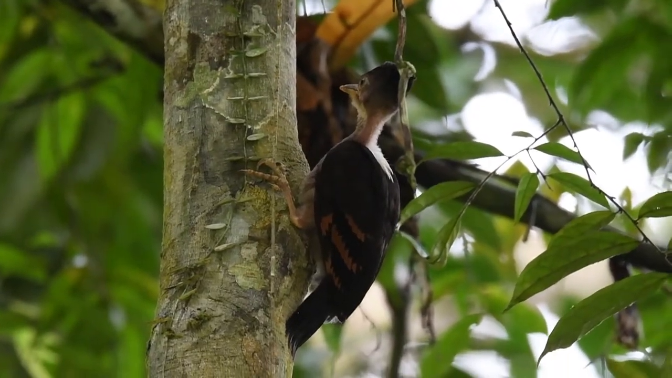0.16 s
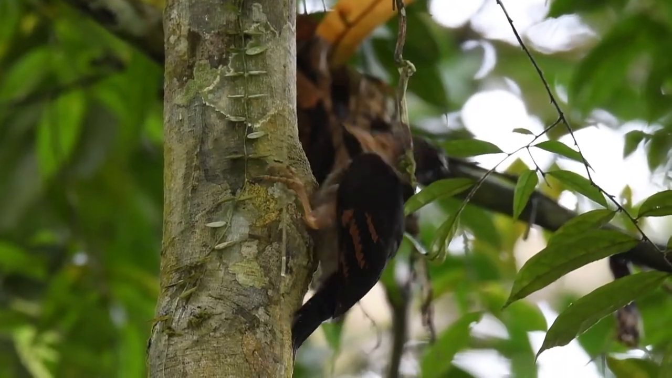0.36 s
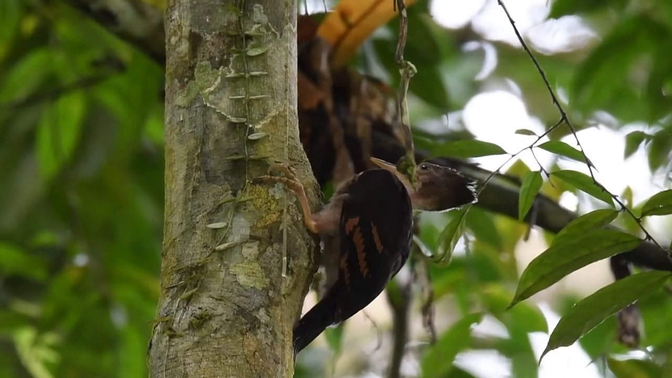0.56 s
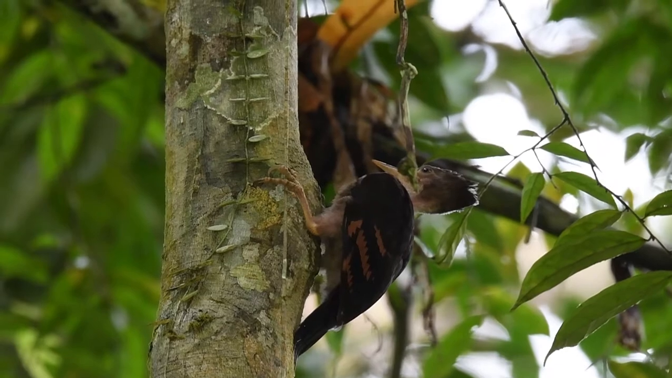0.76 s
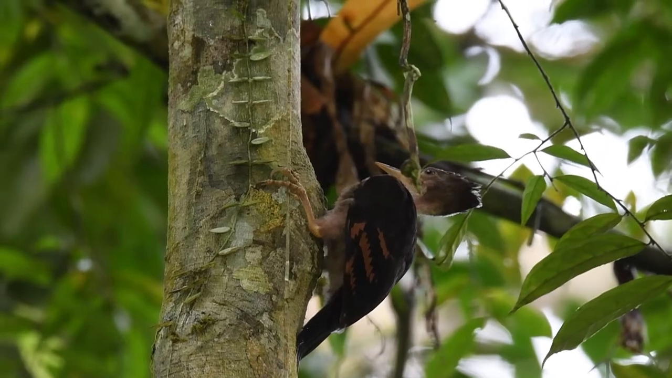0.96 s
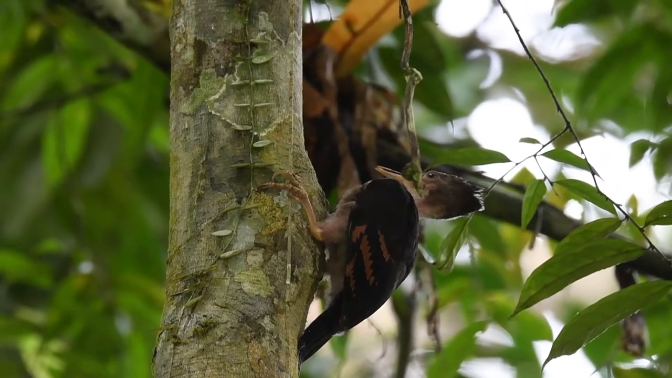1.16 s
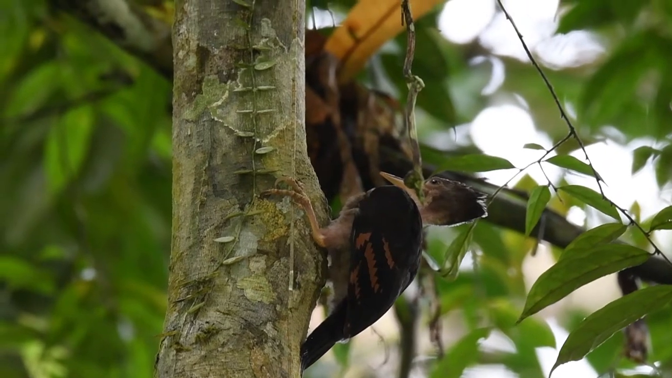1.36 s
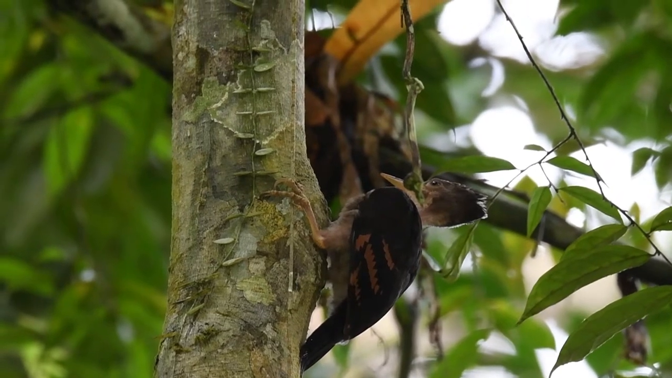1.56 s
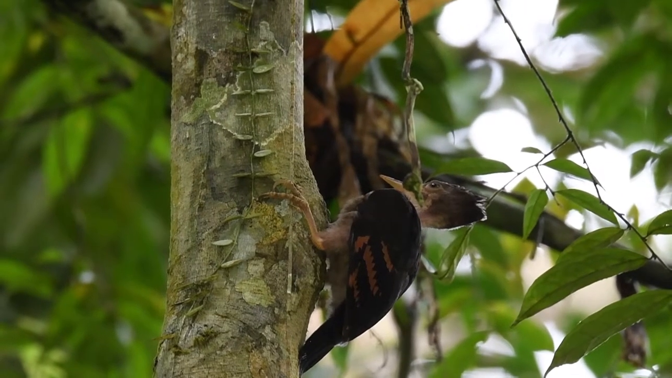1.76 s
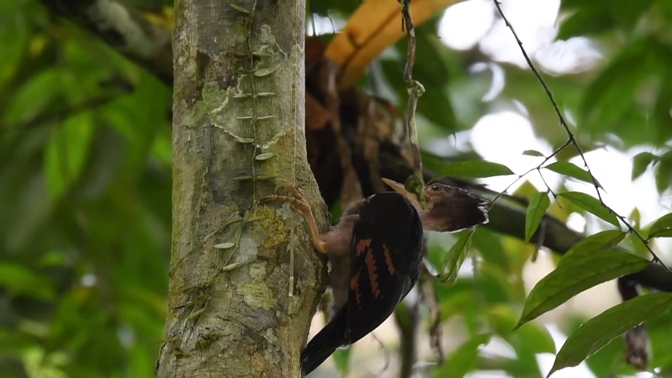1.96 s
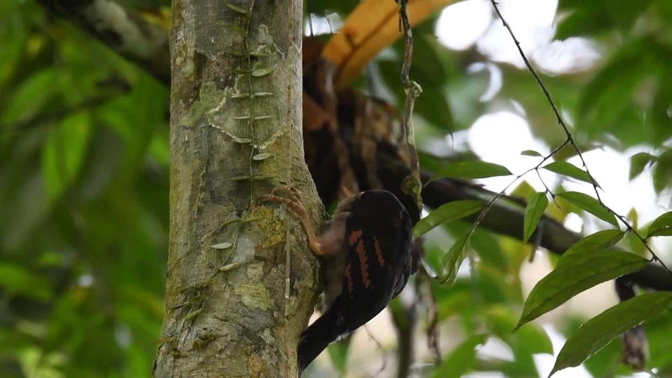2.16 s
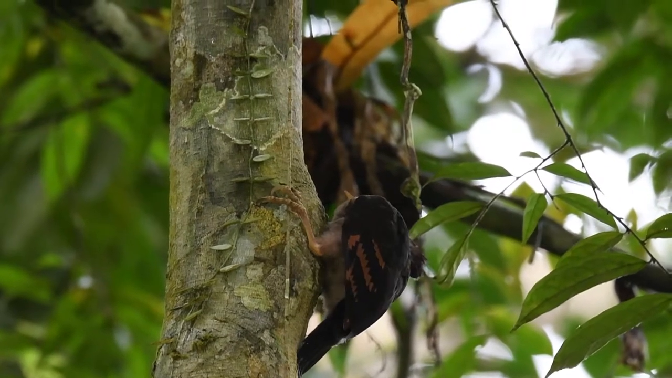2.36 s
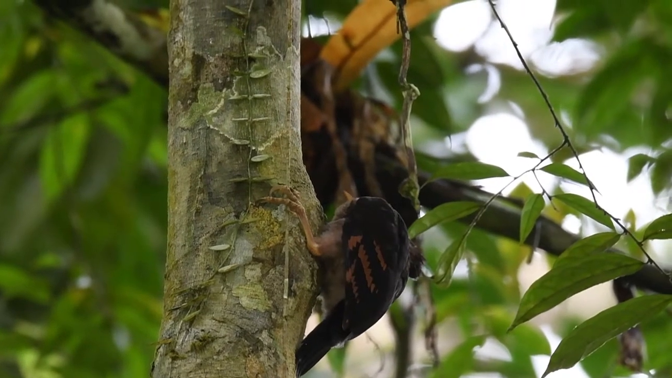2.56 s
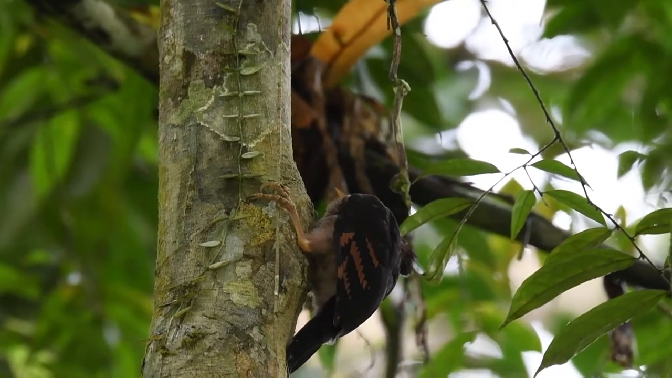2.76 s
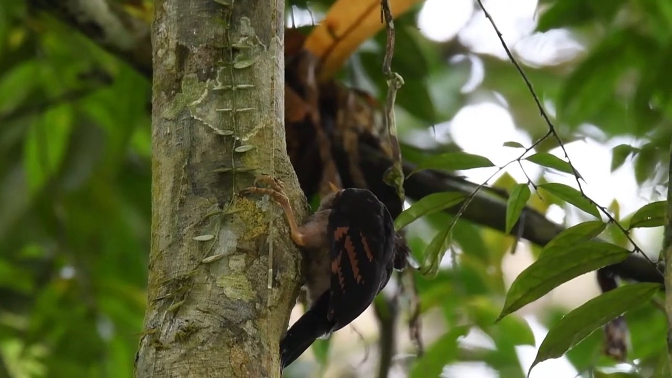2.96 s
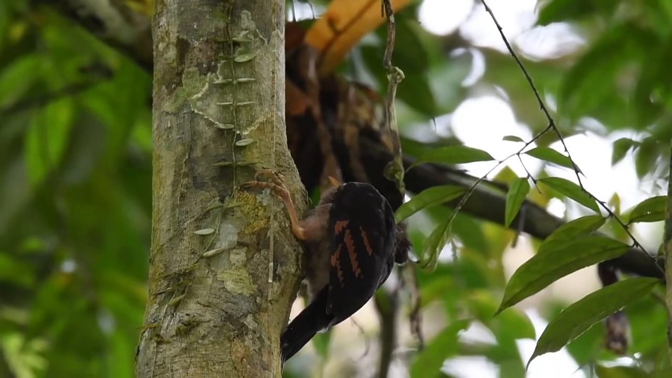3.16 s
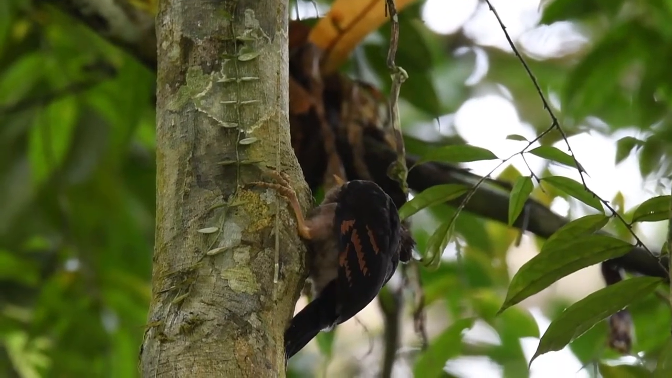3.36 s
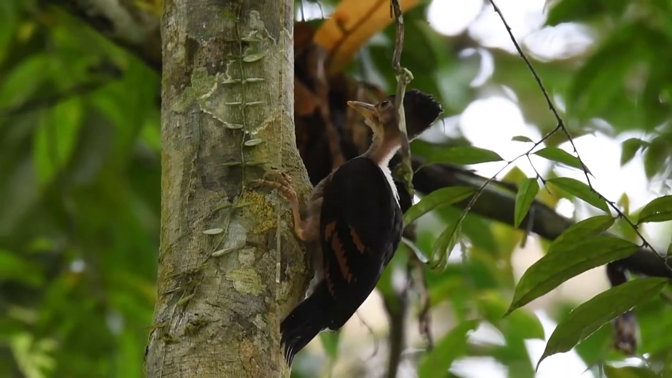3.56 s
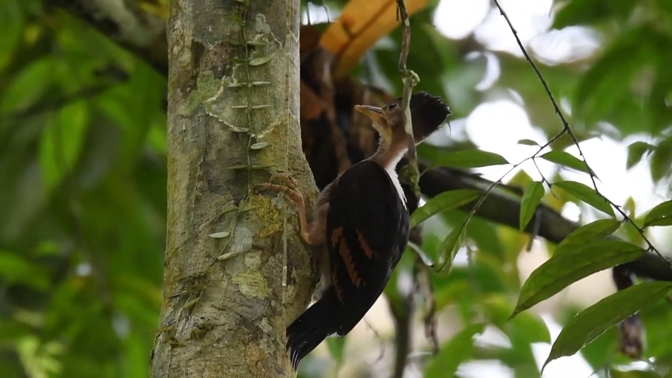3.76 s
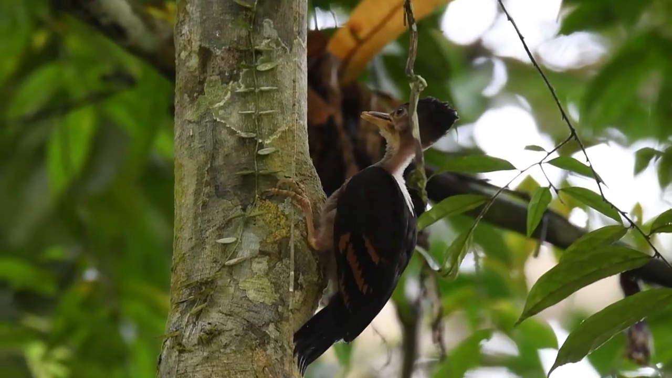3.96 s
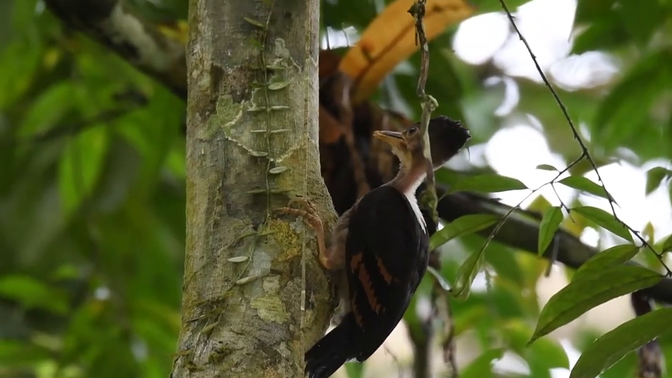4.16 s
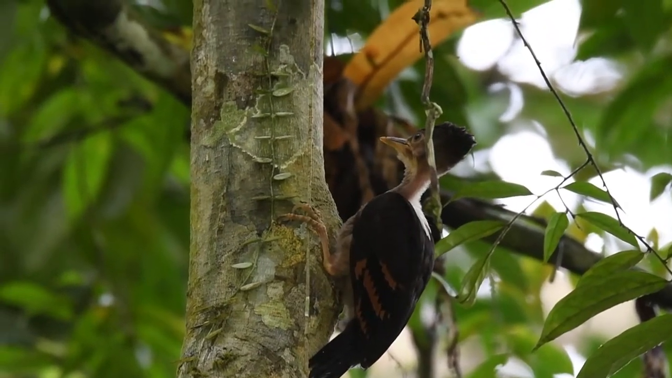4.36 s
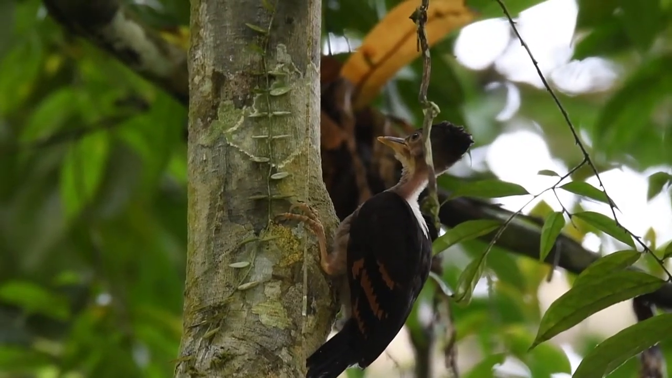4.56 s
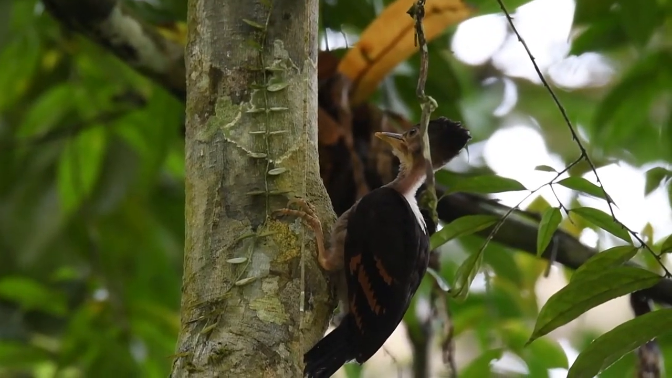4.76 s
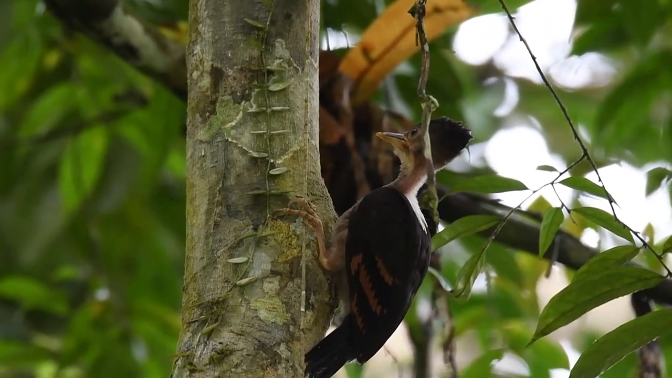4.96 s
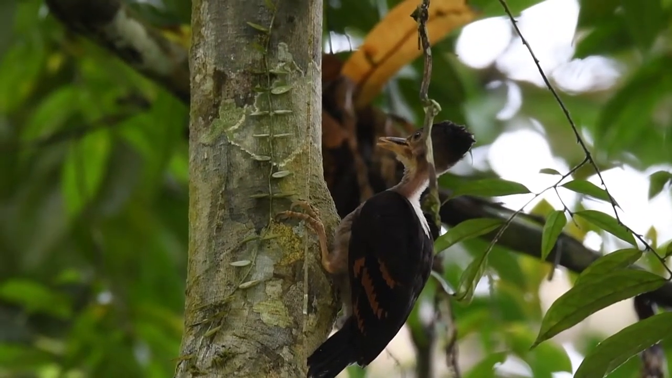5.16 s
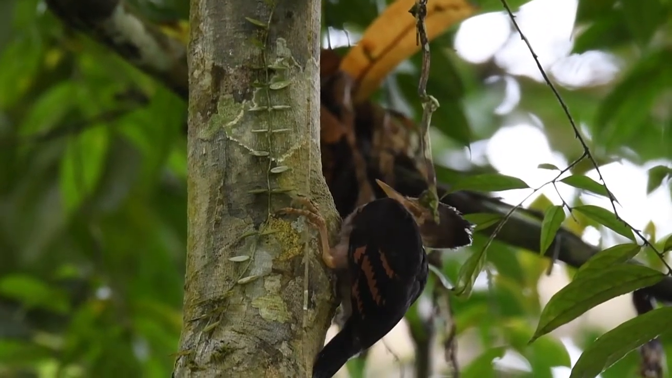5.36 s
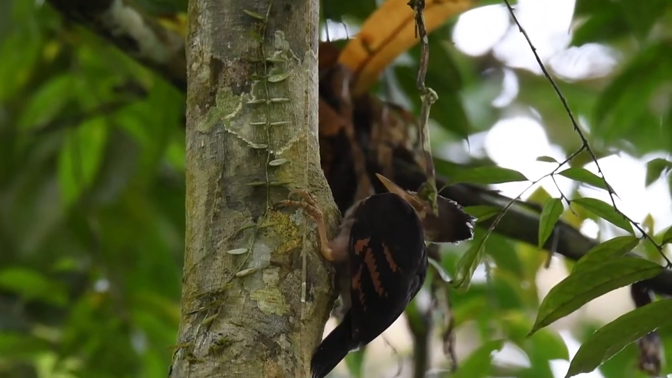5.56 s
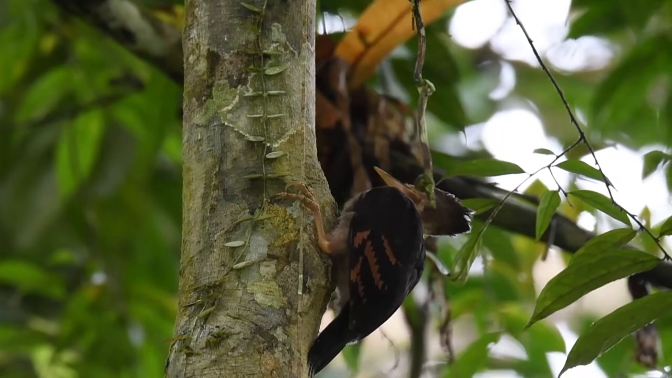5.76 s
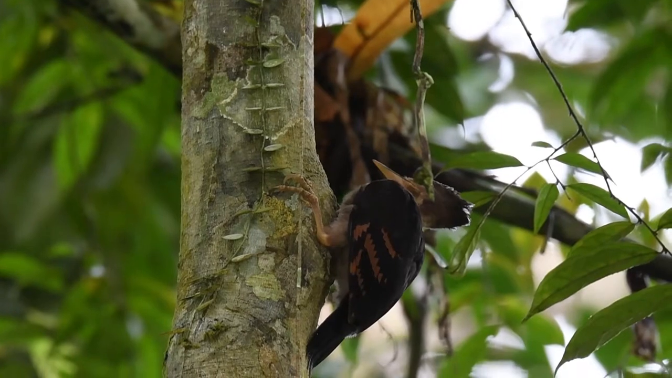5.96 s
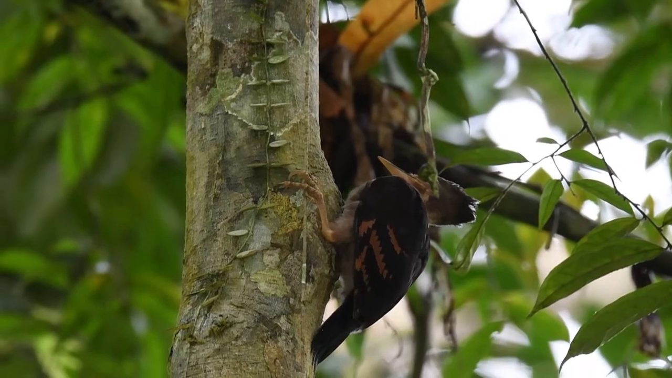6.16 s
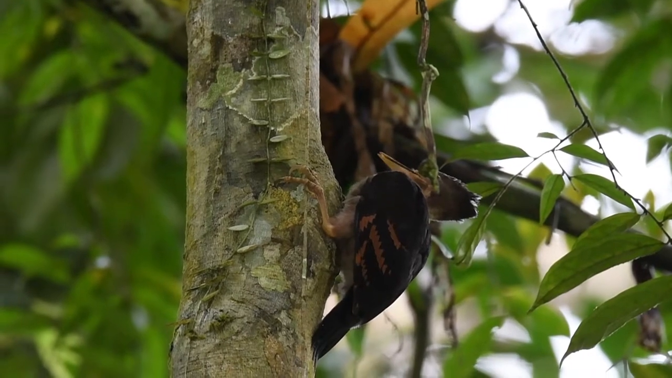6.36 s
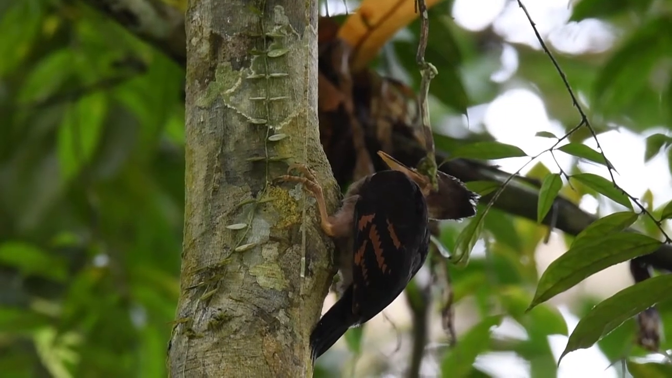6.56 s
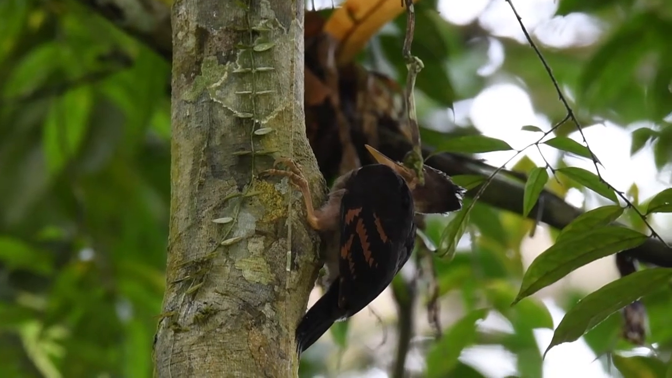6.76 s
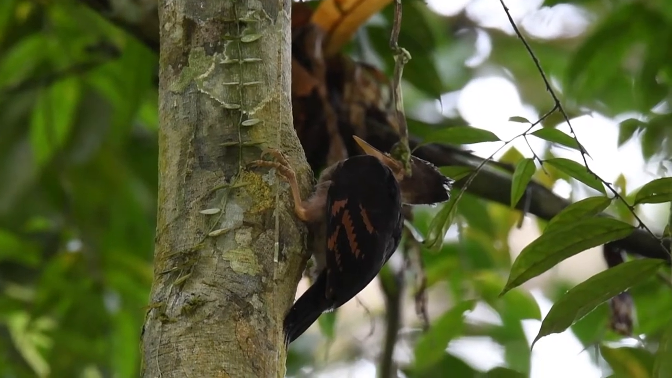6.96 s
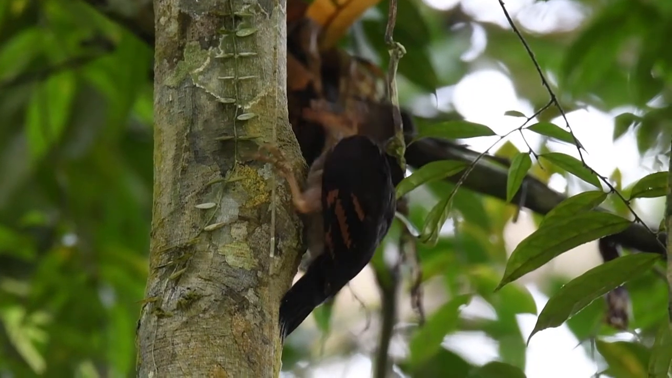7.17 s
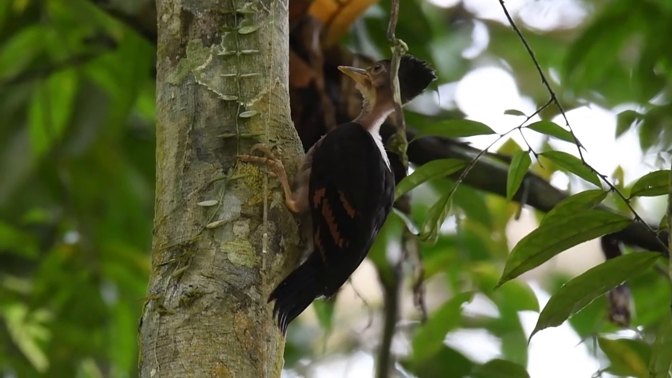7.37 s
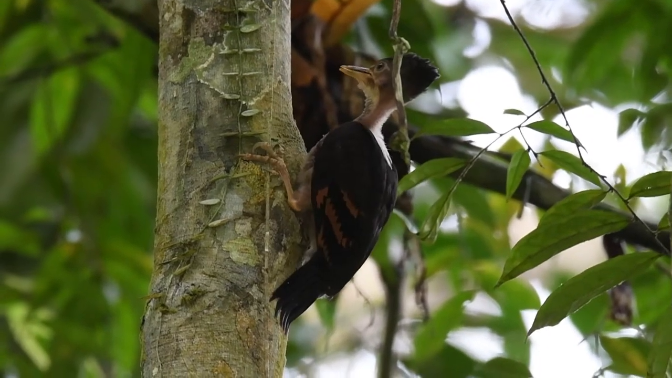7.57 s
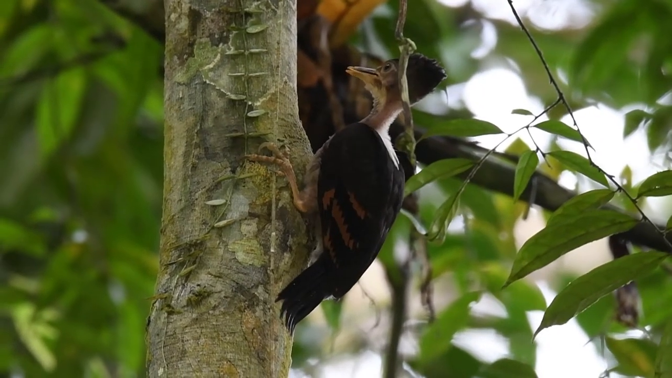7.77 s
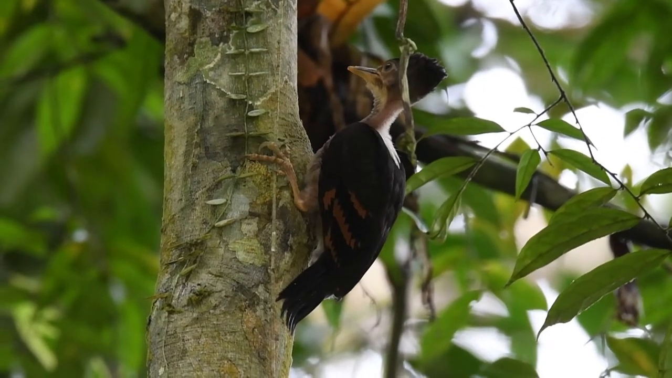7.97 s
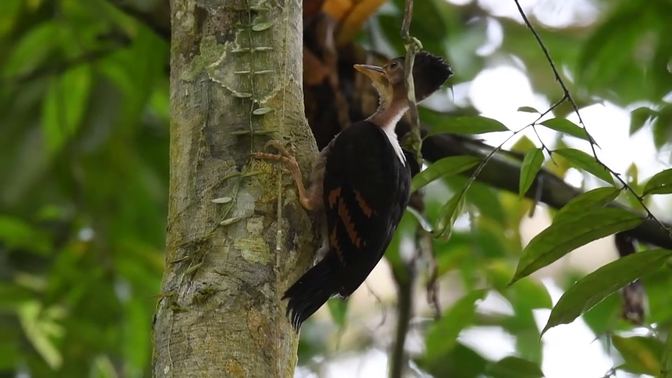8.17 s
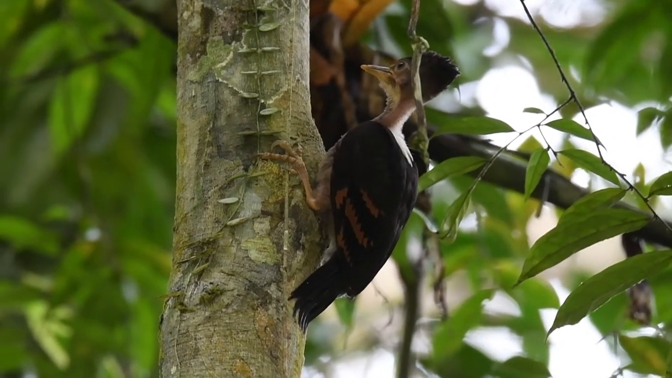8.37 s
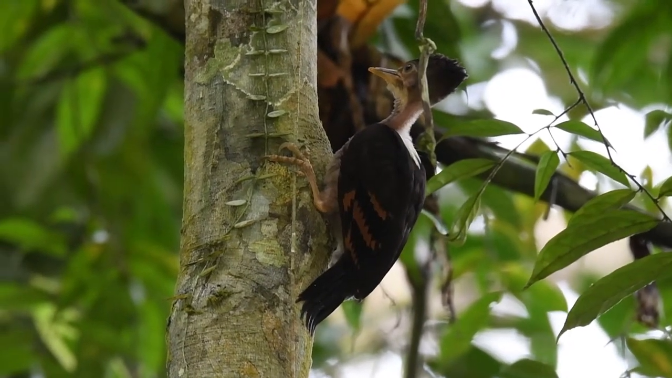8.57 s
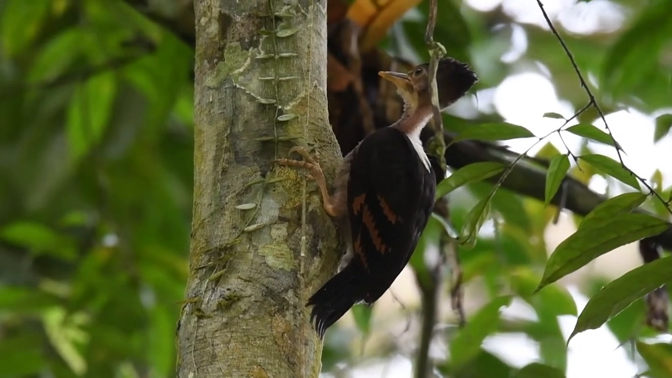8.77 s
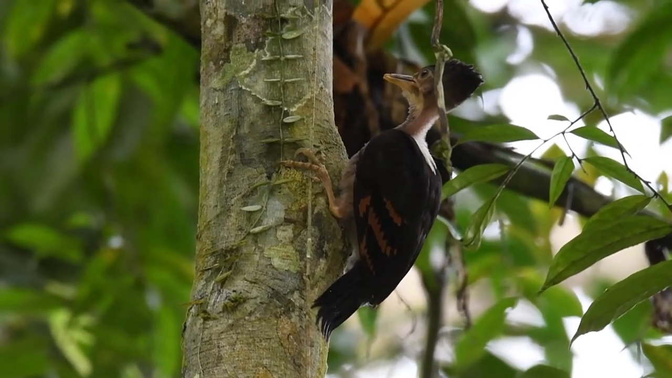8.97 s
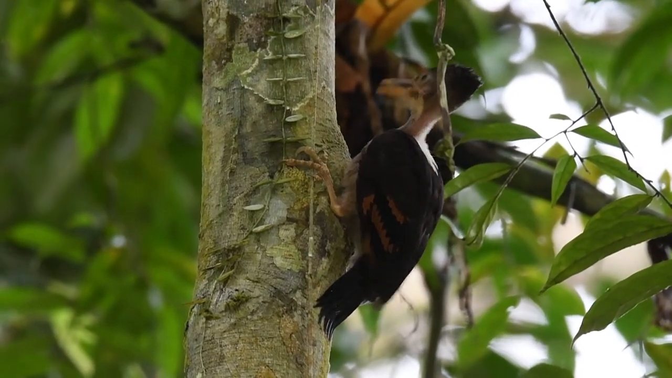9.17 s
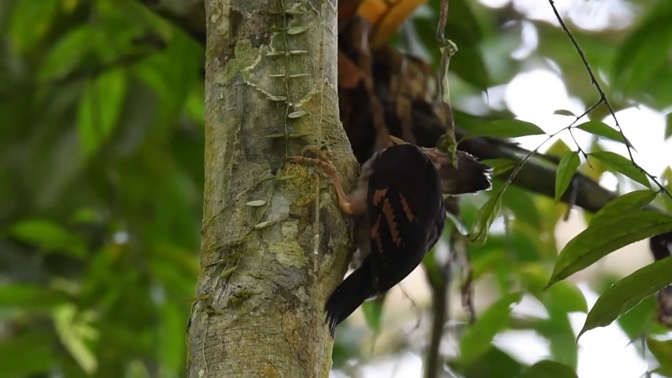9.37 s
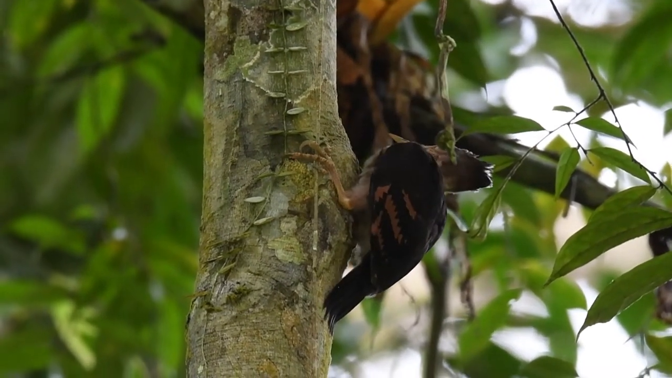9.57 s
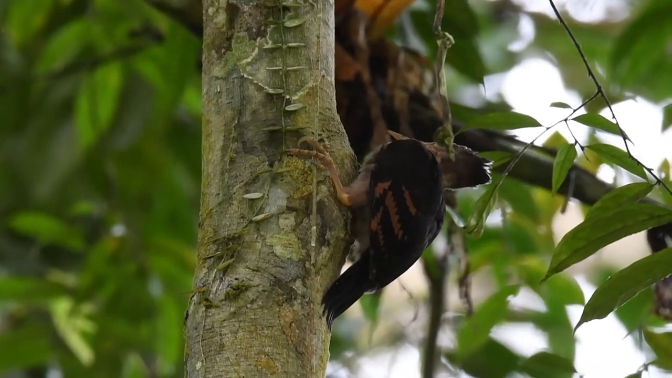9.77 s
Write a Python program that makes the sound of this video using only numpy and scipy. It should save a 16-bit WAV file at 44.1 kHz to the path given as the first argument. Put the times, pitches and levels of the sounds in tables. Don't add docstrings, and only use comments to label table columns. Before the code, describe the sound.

A young woodpecker on a trunk gives six very brief, piercing yelps roughly two seconds apart, loud and slightly overloaded, each ringing on among the trees. Between them a distant bird pips about six times a second, pausing around each yelp. Steady broadband hiss from a stream and insects lies beneath, with thin high cicada whine, faint cricket whistles and rasping katydid bursts. Outdoor stereo camera microphone.

```python
import sys
import numpy as np
from scipy import signal
from scipy.fft import rfft, irfft, next_fast_len
from scipy.io import wavfile
from scipy.ndimage import uniform_filter1d, map_coordinates

SR = 44100
rng = np.random.default_rng(int(sys.argv[2]) if len(sys.argv) > 2 else 0)


def unload_wav(signal):
    wavfile.write(
        sys.argv[1],
        SR,
        np.round(np.clip(np.atleast_2d(signal).T, -1, 1) * 32767).astype(np.int16),
    )


def attenuation_scalar(level_db):
    decades = np.asarray(level_db, float) / 20
    return 10 ** decades


N = 433062

# start_s, top_pitch_hz, second_harmonic_db, third_harmonic_db, beak_open_after_s
YELPS = [
    (0.335, 1814, -13.5, -5, 0.021),
    (2.13, 1893, -10.5, -12.5, 0.029),
    (3.449, 1874, -10.5, -12, .027),
    (5.257, 1868, -13.5, -3, 0.019),
    (7.175, 1915, -10, -8.5, 0.029),
    (9.253, 1843, -14, -4, 0.022),
]
# time_s, climb_share (0 = resting pitch, 1 = top)
YELP_CLIMB = [(0, -.7), (.005, .18), (.011, .7), (.016, .96), (.0195, 1), (.026, .6), (.033, 0),
              (.035, -.25)]
# first_pip_s, last_pip_s, middle_late_s, level_db
PHRASES = [
    (0.124, 0.287, 0, -30.5),
    (0.584, 2.05, -0.023, -28),
    (2.392, 3.373, -0.0085, -27.5),
    (3.692, 5.21, -0.0064, -28.5),
    (5.536, 7.114, .004, -28),
    (7.442, 9.208, .01, -30),
    (9.543, 9.721, 0, -29.5),
]
PIP_COUNTS = [2, 10, 7, 10, 10, 11, 2]
# start_s, end_s, start_hz, end_hz, curve_power (how the pitch sinks)
CICADA_SONGS = [
    (1.15, 9.4, 6213, 5920, 1),
    (1.6, 8.9, 6185, 5995, 1.9),
    (0, 9.82, 5900, 5865, 1),
]
# fundamental_db, octave_db, peak_share (0-1 of the song), blur_hz
CICADA_VOICES = [(-46, -49.5, 0.22, 35), (-46.5, -52, 0.59, 31), (-78, -58.5, 0.9, 25)]
# time_s, pitch_hz, level_db, blur_hz
WIND_UP = [(0, 6090, -42, 300), (.5, 6120, -39.5, 280), (1.1, 6195, -37.5, 200), (1.32, 6208, -42, 120),
           (1.5, 6205, -58, 50)]
# start_s, end_s, start_hz, end_hz, level_db
WHISTLES = [(0, .3, 8610, 8560, -50), (.95, 1.75, 8685, 8570, -49), (2.1, 2.9, 8700, 8585, -49),
            (3.1, 4.2, 8750, 8625, -49), (4.35, 5.3, 8800, 8665, -49), (5.55, 6.55, 8820, 8695, -49),
            (6.75, 7.5, 8830, 8620, -51)]
# start_s, end_s, level_db
KATYDID_BURSTS = [(.1, .63, -41.5), (.78, 1.41, -42.5), (1.524, 2.174, -42), (2.331, 2.897, -42.5),
                  (3.062, 3.671, -42.5), (3.832, 4.4, -43), (4.53, 5.13, -43), (5.271, 5.886, -41.5),
                  (6.074, 6.682, -43), (6.814, 7.398, -42), (7.53, 8.12, -42.5), (8.28, 8.83, -43),
                  (9.036, 9.63, -42), (9.75, 9.9, -43)]
# frequency_hz, density_db (per Hz)
HISS_LEFT = [(25, -28), (80, -12.5), (250, -4.5), (700, -0.5), (1800, -0.5), (2500, -8), (3100, -1.5),
             (4000, -3), (6200, -2.5), (7200, -6), (8700, -3), (10300, -6.5), (11500, -19), (12400, -17.5)]
HISS_RIGHT = [(25, -30), (80, -12.5), (250, -4.5), (700, 0), (1400, 4.5), (2500, -1.5), (3100, -1),
              (4600, -2), (6300, 1.5), (7200, -4.5), (8700, -4), (10300, -16), (11500, -15), (12400, -17)]
# frequency_hz, likeness (0-1)
HISS_LIKENESS = [(60, 0.98), (110, 1.0), (190, 1.0), (350, 1), (630, 0.92), (1130, 0.29), (2030, 0.0),
                 (3650, 0), (6570, 0), (11800, 0)]
# frequency_hz, decay_s (time to fall 60 dB)
FOREST_DECAY = [(1500, 0.1178), (3500, 0.71), (5300, 0.6), (8500, 0.47), (12000, 0.055)]
# center_hz, width_hz
NOTCHES = [(2597, 158), (7712, 525)]
# frequency_hz, margin_db
HIDING_MARGIN = [(2600, 13), (7700, 14), (10500, 9), (11500, 6.5), (12300, 8), (12700, .8), (15000, 0)]


def unit(x):
    return x / np.sqrt(np.mean(x ** 2) + 1e-20)


def along(points, hz):
    f, v = np.transpose(points)
    return np.interp(np.log(hz + 1), np.log(f + 1), v)


def wobble(rate, size):
    knots = rng.standard_normal(int(size * rate / SR) + 4)
    return map_coordinates(knots, [np.arange(size) * rate / SR])


def filtered(x, response):
    m = next_fast_len(N + SR // 2)
    return irfft(rfft(x, m) * response(np.fft.rfftfreq(m, 1 / SR)), m)[..., :N]


def columns(rows, smooth):
    s, *cols = np.transpose(rows)
    t = np.arange(s[0], s[-1] + smooth, 1 / SR)
    size = 1 + int(smooth * SR)
    return round(s[0] * SR), [uniform_filter1d(np.interp(t, s, c), size, mode="nearest") for c in cols]


def add(mix, start, x):
    n = min(x.shape[-1], mix.shape[-1] - start)
    mix[..., start:start + n] += x[..., :n]


def in_forest(x, pan_db, lag, wet_db, late_db):
    hz, t, z = signal.stft(rng.standard_normal((2, SR)), SR, nperseg=256)
    decay = attenuation_scalar(-60 * t / along(FOREST_DECAY, hz)[:, None])
    tail = signal.istft(z * decay, SR, nperseg=256)[1][:, :SR]
    t = np.arange(SR) / SR
    uneven_db = 1.33 * rng.standard_normal((2, SR))
    near = rng.standard_normal((2, SR)) * attenuation_scalar(uneven_db - 60 * t / 0.12) * (t > .004)
    tail = tail * (1 - np.exp(-t / 0.004))
    response = attenuation_scalar(wet_db) * near / np.linalg.norm(near[0]) + attenuation_scalar(late_db) * tail / np.linalg.norm(tail[0])
    response[[0, 1], [lag, 0]] += attenuation_scalar([pan_db / 2, -pan_db / 2])
    return signal.fftconvolve(x[None], response, axes=1)


def woodpecker():
    rest_hz = 1597
    onset_s, onset_db = .005, 10
    second_top_s, second_rise, second_fall = 0.015, 686, 1091
    beak_shut_db, beak_fall = -21, 450
    muffle, early_s = 1000, 0.022
    throat_hz, throat_db, throat_slope = 1700, -15.5, 0.09

    mix = np.zeros((2, N))
    _, (climb,) = columns(YELP_CLIMB, smooth=.0045)
    size = len(climb)
    t = np.arange(size) / SR
    catch_db = -onset_db * np.clip(1 - t / onset_s, 0, 1)
    closing = np.clip((size - np.arange(size)) / (.006 * SR), 0, 1)
    for s, top_hz, second_top_db, third_top_db, open_s in YELPS:
        hz = rest_hz + (top_hz - rest_hz) * climb
        phase = 2 * np.pi * np.cumsum(hz * (1 + 0.0037 * wobble(530, size))) / SR
        lead_s = 0.59 * (open_s - early_s)
        second_db = second_top_db - second_rise * np.clip(second_top_s - lead_s - t, 0, None)
        second_db = second_db - second_fall * np.clip(t - second_top_s, 0, None)
        third_db = np.interp(t, [onset_s, open_s], [beak_shut_db, third_top_db])
        third_db = third_db - beak_fall * np.clip(t - open_s, 0, None)
        muffled_db = muffle * (open_s - early_s) * np.clip((open_s - t) / onset_s, 0, 1)
        upper_db = throat_db - throat_slope * np.abs(hz - throat_hz) - muffled_db
        slack_db = 70 * (hz / hz.max() - 1)
        levels_db = [slack_db - 25.5, second_db + .5 * catch_db, third_db + catch_db - .3 * muffled_db,
                     upper_db - .5, upper_db + .5, slack_db - 34.0, slack_db - 40]
        voice = np.zeros(size)
        for harmonic, db in enumerate(levels_db, start=1):
            flutter_db = 0.53 * wobble(400, size)
            voice += attenuation_scalar(db + flutter_db) * np.sin(harmonic * phase)
        rasp = 1 + .24 * wobble(2500, size)
        yelp = attenuation_scalar(1.3) * voice * rasp * closing
        add(mix, round(s * SR), in_forest(yelp, pan_db=-.6, lag=0, wet_db=-.8, late_db=-3.5))
    return mix


def far_bird():
    half_s, edge_s, drop, bend = .0175, .004, .4, 1.8
    top_pitch_hz, timid_hz, eager_hz = 1400, 45.5, 70.5
    timid_db, eager_db = 1, 1.5
    flash_s, flash_wide_s = .013, .004
    trunk_s, trunk_db = .029, -10.5

    t = np.arange(-half_s, half_s, 1 / SR)
    arch = 1 - drop * np.abs(t / half_s) ** bend
    edge = np.clip((half_s - np.abs(t)) / edge_s, 0, 1)
    third_db = -12 + 9 * np.exp(-((t - flash_s) / flash_wide_s) ** 2)
    mix = np.zeros((2, N))
    for (first_s, last_s, late_s, db), count in zip(PHRASES, PIP_COUNTS):
        u, chance = np.linspace(0, 1, count), rng.standard_normal((count, 2))
        times = first_s + (last_s - first_s) * u + late_s * np.sin(np.pi * u)
        tops_hz = top_pitch_hz - timid_hz * (u == 0) + eager_hz * (u == 1) * (count > 2) + 18 * chance[:, 0]
        levels_db = db - timid_db * (u == 0) + eager_db * (u == 1) + .8 * chance[:, 1]
        fourth_db = -2 + 2.2 * (-29 - db)
        voice = np.zeros(2 * SR)
        for s, top_hz, level_db in zip(times, tops_hz, levels_db):
            phase = 2 * np.pi * np.cumsum(top_hz * arch * (1 + .012 * wobble(550, len(t)))) / SR
            pip = np.sin(2 * phase) + attenuation_scalar(-10.5) * np.sin(phase)
            pip += attenuation_scalar(third_db) * np.sin(3 * phase)
            pip += attenuation_scalar(fourth_db) * arch ** 5 * np.sin(4 * phase)
            add(voice, round((s - first_s) * SR), attenuation_scalar(level_db) * edge * pip)
        add(voice, round(trunk_s * SR), attenuation_scalar(trunk_db) * voice.copy())
        wet = in_forest(voice, pan_db=-5, lag=1, wet_db=-5, late_db=-8)
        add(mix, round((first_s - half_s) * SR), wet)
    return mix


def cicadas():
    swell_db, fade_s = 25, 0.24
    mix = np.zeros((2, N))
    for song, (low_db, high_db, peak, blur_hz) in zip(CICADA_SONGS, CICADA_VOICES):
        s, end, high_hz, low_hz, bend = song
        u = np.linspace(0, 1, round((end - s) * SR))
        fade = np.clip(np.minimum(u, 1 - u) * (end - s) / fade_s, 0, 1)
        hz = high_hz + (low_hz - high_hz) * u ** bend
        swelling_db = low_db - swell_db * (u - peak) ** 2
        add(mix, round(s * SR), fade * cicada(hz, swelling_db, high_db, blur_hz))
    start, (hz, db, blur_hz) = columns(WIND_UP, smooth=0.048)
    add(mix, start, cicada(hz, db, db - 25, blur_hz))
    return mix


def cicada(hz, low_db, high_db, blur_hz):
    tone = whine(hz, low_db + 6.0, .8 * blur_hz, pan_db=-1.5)
    octave = whine(2 * hz, high_db + 1.0, blur_hz, pan_db=7.5)
    haze = whine(2 * hz - 120, high_db - 7.0, blur_hz=192, pan_db=3)
    return tone + octave + haze


def whine(hz, db, blur_hz, pan_db):
    place = np.cumsum(np.broadcast_to(blur_hz, hz.shape)) / SR

    def fade():
        knots = rng.standard_normal(3000) + 1j * rng.standard_normal(3000)
        return np.interp(place, np.arange(3000), knots)

    fading = .5 * fade() + .6 * np.array([fade(), fade()]) + .8
    tone = np.exp(2j * np.pi * np.cumsum(hz) / SR)
    return attenuation_scalar(db + np.array([[pan_db / 2], [-pan_db / 2]])) * np.real(fading * tone)


def cricket():
    mix = np.zeros((2, N))
    for s, end, high_hz, low_hz, db in WHISTLES:
        u = np.linspace(0, 1, round((end - s) * SR))
        sag = (1 - np.cos(np.pi * u)) / 2
        hz = high_hz + (low_hz - high_hz) * sag
        swell = np.sin(np.pi * u) ** .4
        add(mix, round(s * SR), swell * whine(hz, db + 2.5, blur_hz=45, pan_db=2.5))
    return mix


def katydid():
    t = np.arange(N) / SR
    bursts = np.zeros(N)
    for s, end, db in KATYDID_BURSTS:
        bursts += attenuation_scalar(db) * np.clip((t - s) / 0.055, 0, 1) * np.clip((end - t) / 0.018, 0, 1)
    stroke_phase = 2 * np.pi * np.cumsum(135 + .5 * wobble(3, N)) / SR
    strokes = (.5 + .5 * np.cos(stroke_phase)) ** 2.5
    shared = rng.standard_normal(N) + .11 * np.sin(2 * np.pi * 10020 * t)
    own = rng.standard_normal((2, N))
    scrape = strokes * (shared * [[1], [-1]] + .5 * own)
    ring = filtered(scrape, lambda f: np.exp(-((f - 10000) / 380) ** 2))
    return attenuation_scalar([[4], [-6]]) * bursts * unit(ring)


def hiss():
    z = signal.stft(rng.standard_normal((2, N + 512)), nperseg=512)[2]
    patches = uniform_filter1d(uniform_filter1d(rng.standard_normal(z.shape[1:]), 6, 0), 14, 1)
    pair = signal.istft(z * attenuation_scalar(0.74 * unit(patches)), nperseg=512)[1][:, :N]

    def share(hz):
        turn = np.arccos(np.clip(along(HISS_LIKENESS, hz), -1, 1)) / 2
        return np.array([np.cos(turn), np.sin(turn)])

    mid, side = filtered(pair, share)
    sides = np.array([mid + side, mid - side])
    coloured = filtered(sides, lambda hz: attenuation_scalar([along(HISS_LEFT, hz), along(HISS_RIGHT, hz)]))
    return attenuation_scalar(-27.0 + 0.15 * wobble(1.69, N)) * unit(coloured)


def scene():
    return woodpecker() + far_bird() + cicadas() + cricket() + katydid() + hiss()


def masked(x, skirt_db):
    hz, _, z = signal.stft(x, SR, nperseg=2048, noverlap=1024)
    bands = (np.abs(z[:, :1024]) ** 2).reshape(2, 256, 4, -1).mean(axis=(0, 2))
    center = hz[2:1024:4]
    spread = attenuation_scalar(-2 * skirt_db * np.abs(center[:, None] - center) / 1000)
    neighbours = (spread @ bands) / spread.sum(axis=1, keepdims=True)
    hidden = bands < attenuation_scalar(-2 * along(HIDING_MARGIN, center))[:, None] * neighbours
    keep = np.repeat(~hidden | (center[:, None] < 2300), 4, axis=0)
    return signal.istft(z * np.vstack([keep, keep[-1:]]), SR, nperseg=2048, noverlap=1024)[1][:, :N]


def top_cut(x):
    return signal.sosfilt(signal.butter(12, 15800, fs=SR, output="sos"), x)


def record(dry):
    def tone(f):
        response = attenuation_scalar(-5 * np.clip(f - 12450, 0, None) / 1000)
        for center, width in NOTCHES:
            gap = center * center - f * f
            response = response * (gap / (gap + 1j * f * width)) ** 2
        return response

    x = masked(filtered(dry, tone), skirt_db=5)
    return top_cut(np.clip(x, -.98, .98))


dry = scene()
out = record(dry)
unload_wav(out)
```